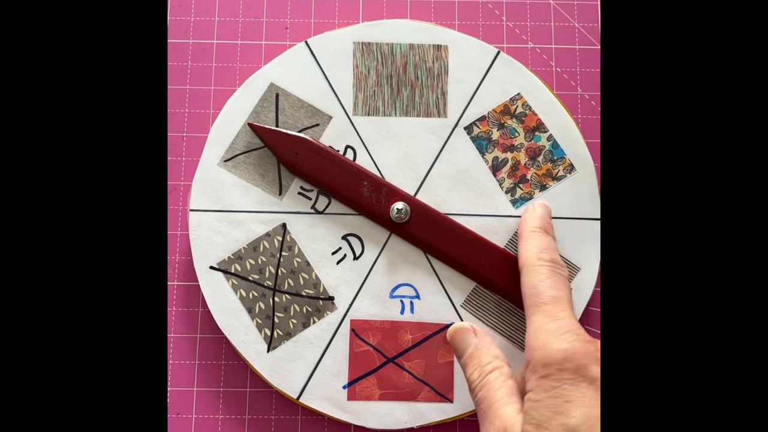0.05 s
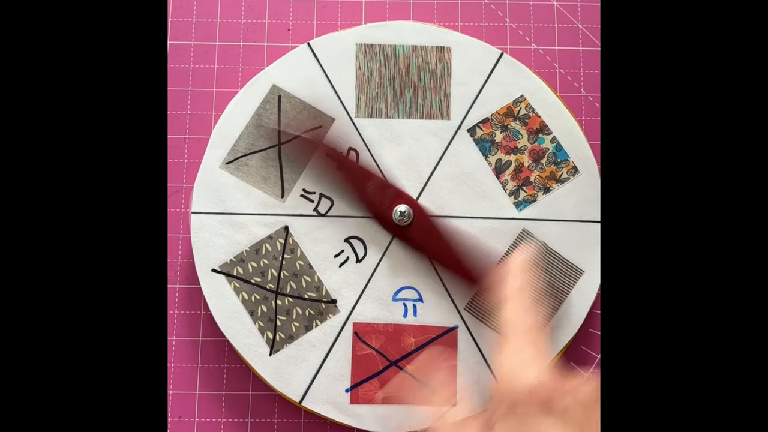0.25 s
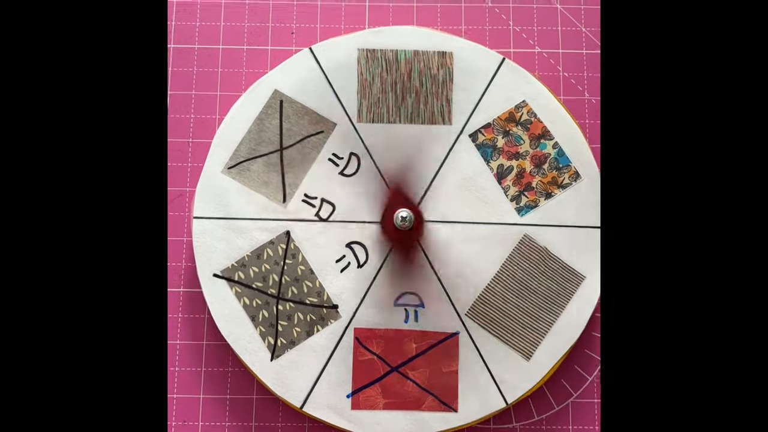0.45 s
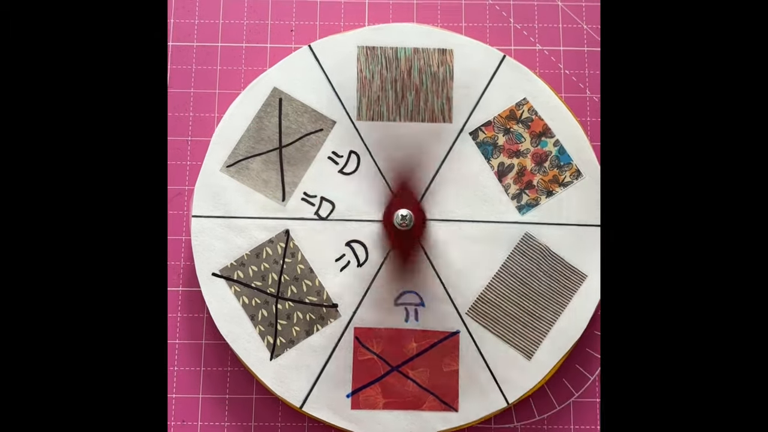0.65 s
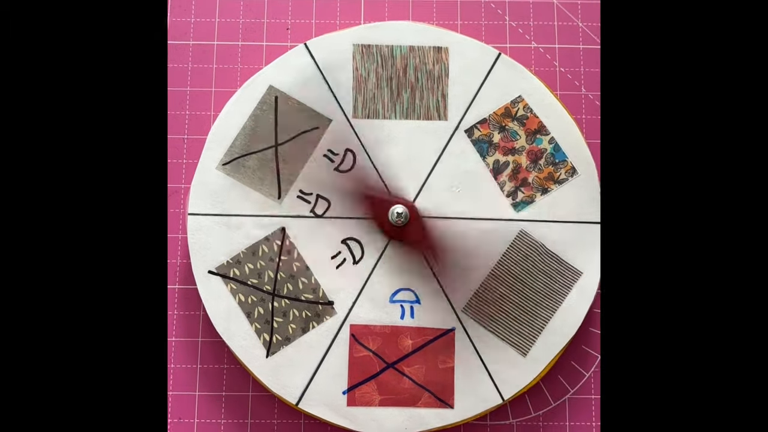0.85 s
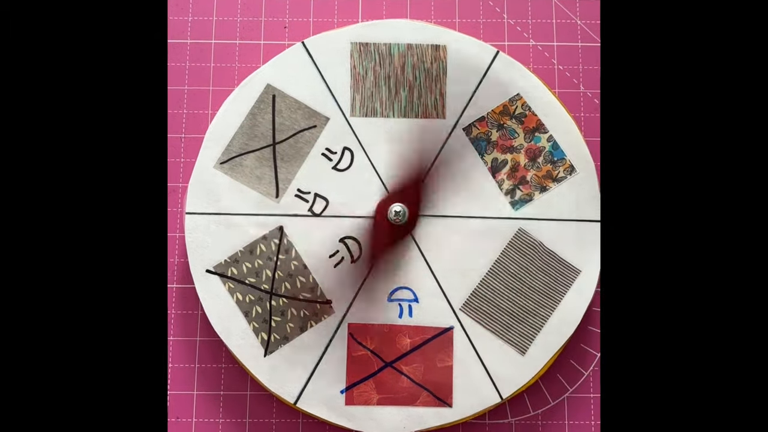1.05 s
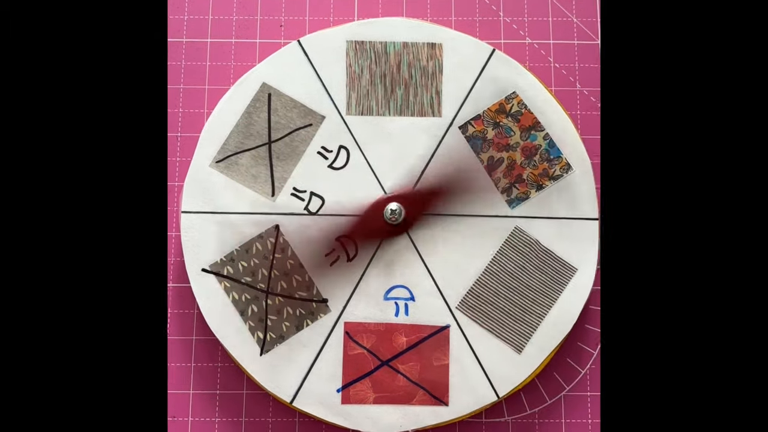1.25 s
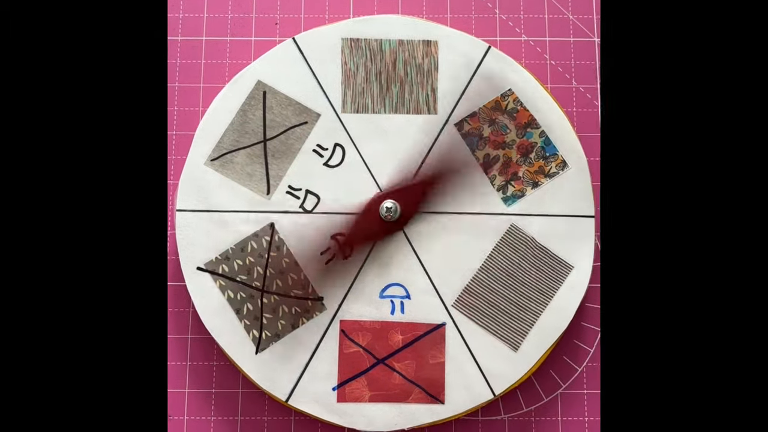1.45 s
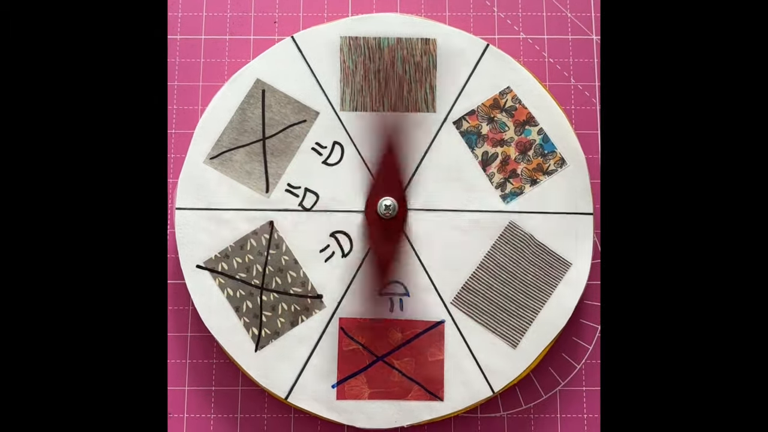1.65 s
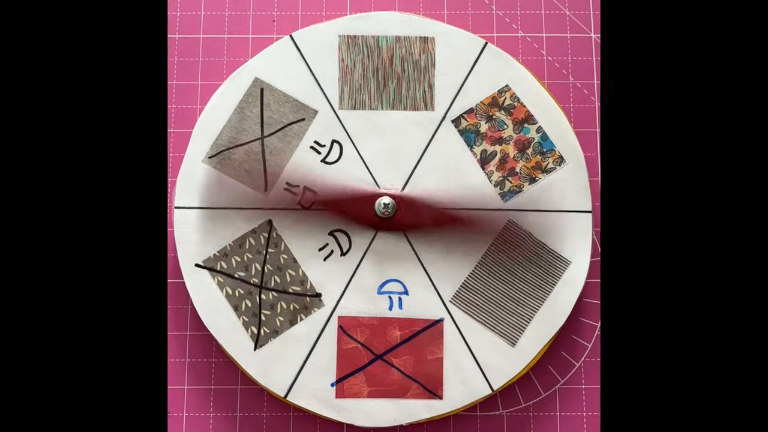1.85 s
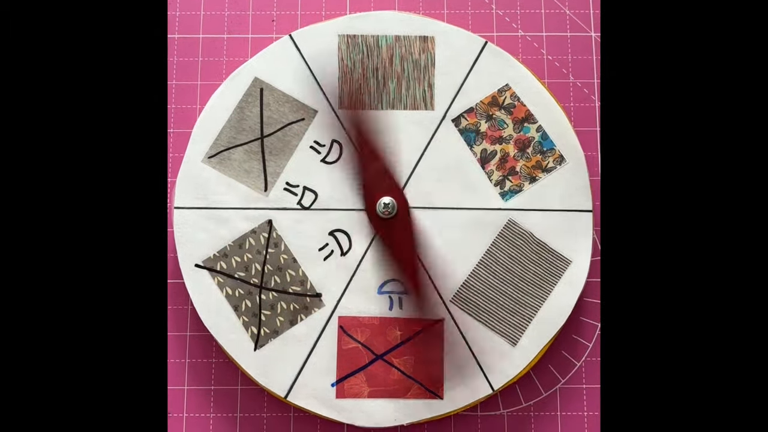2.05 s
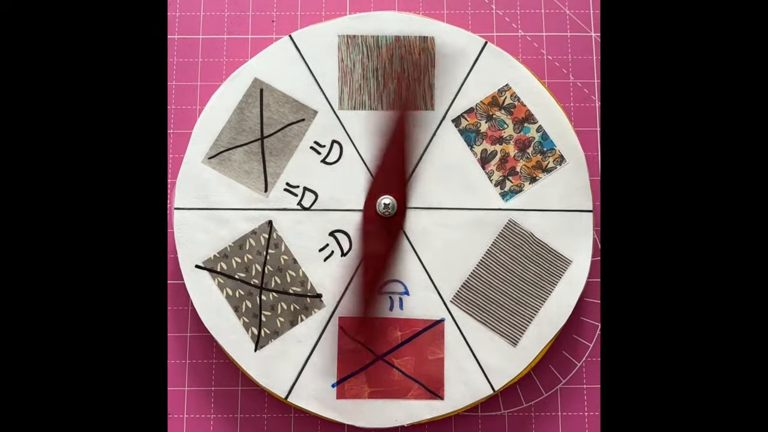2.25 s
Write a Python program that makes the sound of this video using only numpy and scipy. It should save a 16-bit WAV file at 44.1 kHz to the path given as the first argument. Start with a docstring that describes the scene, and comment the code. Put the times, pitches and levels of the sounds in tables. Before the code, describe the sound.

A game spinner's pointer is flicked with a sharp snap, then rattles rapidly, knocking on its board with small squeaks and metallic ticks. The rattle thins as the spin slows, heard close up in a small, quiet room.

```python
"""A sharp snap, then a dry, chirpy rattle: a finger flicks the pointer of a homemade spinning wheel.
Loose on its screw, the pointer rocks and knocks on the board, its hub chirps, rasps and rubs,
and the metal washer ticks. The rattle thins out as the spin slows.
Underneath, the board rumbles faintly on its table, in the still air of a small room."""
import sys
import numpy as np
from scipy import signal
from scipy.fft import rfft, irfft, next_fast_len
from scipy.io import wavfile
from scipy.ndimage import uniform_filter1d

SR = 44100
rng = np.random.default_rng(int(sys.argv[2]) if len(sys.argv) > 2 else 0)


def transcribe(signal):
    """Save signal, clipped to [-1, 1], as a 16-bit WAV file at the path in sys.argv[1]."""
    frames = np.atleast_2d(signal).T
    limited = np.clip(frames, -1, 1)
    pcm = np.round(limited * 32767).astype(np.int16)
    wavfile.write(sys.argv[1], SR, pcm)


N = 101429
T = np.arange(SR // 8) / SR   # time axis of one contact [s]
FLICK_S, REBOUND_S = .2291, .006
FADE_DB_PER_S = 6   # rubbing and faint contacts die away


# woody ring of pointer and board (frequency [Hz], level [dB], t60 [s])
BOARD_MODES = [(656.5, -28.5, 0.11), (916, -4, 0.064), (960.7, -2.5, 0.042), (1132, -5.5, 0.044),
               (1253, 4.5, 0.043), (1357.4, 2.5, 0.017), (1657, -6.5, 0.049), (1820, -13, 0.041),
               (2692, 4, 0.033), (2830, 4.5, 0.0057), (4130, -14, 0.023), (4688, -6.5, 0.026),
               (5006, -10, 0.011)]
# colour of the contact noise (frequency [Hz], level [dB])
CRACK_SPECTRUM = [(300, -32), (700, -25.5), (1000, 5.5), (1700, 6), (2900, -2), (3600, -9.5), (5000, -16),
                  (8000, -19.5), (15000, -30.5)]

def knock(db, middle_db, upper_db, damping=1, scatter=1):
    """The pointer hits the board: low, middle and upper modes ring over a short crack."""
    modes = np.array(BOARD_MODES) * [1, 1, damping]
    group = np.digitize(modes[:, 0], (1050, 2000))   # group edges [Hz]
    lags = REBOUND_S * damping * rng.random(2)
    low, middle, upper = [rebound(ring(modes[group == k], detune, scatter), lags, db=-9)
                          for k, detune in enumerate((.012, .025, .02))]
    body = unit(low + from_db(middle_db) * middle)
    crack = unit(noise(CRACK_SPECTRUM, len(T)) * decay(t60=.061 * damping))
    hit = body + from_db(upper_db) * upper + from_db(upper_db / 2 - 5.5) * crack
    return from_db(db - .5) * hit / loudest(body, size=132)


# accents of the rattle (time [s], relative level [dB], middle over low modes [dB], upper over body [dB])
KNOCK_HITS = [(0.2395, -33, 1, -25.5), (0.2481, -23.5, 2, -12), (0.276, -34, 1, 0.5),
              (0.317, -31.5, 1.5, 1), (0.334, -34.5, -6, -1), (0.3612, -22, -14, -7),
              (0.426, -36.5, 3, -3.5), (0.4445, -33, 31, -10), (0.466, -34.5, -6, -29),
              (0.4819, -24, -7.5, -11), (0.4942, -34, 25, 4.5), (0.5575, -31.5, -2, -1),
              (0.5657, -30, 6.5, -1.5), (0.6126, -32, -1, -5), (0.639, -33.5, 17, -2),
              (0.6954, -33.5, -6, -3.5), (0.7072, -27.5, 35, -6.5), (0.7358, -33, -9, -33),
              (0.7668, -21.5, -3.5, -10), (0.78, -47, 1, -9), (0.869, -30.5, 2, -8.5),
              (0.9089, -33, -12, -20), (0.923, -28.5, -1.5, 0.5), (0.9393, -29, 5, -1),
              (0.994, -34.5, -4, -7), (1.0331, -30.5, 3, -7), (1.0531, -26.5, 2, -21),
              (1.0638, -35.5, -24, -9.5), (1.0969, -37, 18, -0.5), (1.1085, -32.5, 10, -4),
              (1.1871, -40, -5, -5), (1.206, -36, 7, -5.5), (1.223, -32.2, 6, -6), (1.244, -33.5, -7, -5.5),
              (1.2732, -30, 2, -3), (1.2967, -32.5, 25, 2), (1.3338, -44, 15, 0.5), (1.407, -38.5, 23, 1),
              (1.4408, -35, -2, -28), (1.4491, -42.5, 0, -23), (1.4666, -44, 5, -25), (1.4886, -37, 5, 1.5),
              (1.4961, -21, 2, -5.5), (1.531, -40, -5, -21), (1.639, -40.5, -4, -4.5),
              (1.6486, -36.5, -4, -8), (1.6724, -36, -1.5, -21), (1.7105, -33.5, -14, -18),
              (1.739, -31.5, 14, -8.5), (1.7582, -37.5, -1, -8), (1.772, -34, 33, -6),
              (1.852, -40, -6, -22), (1.901, -35, 14, -6.5), (1.939, -34, -3, -32.5),
              (1.9733, -42.5, -2, -10), (1.9979, -25.5, -7, -12.5), (2.0184, -32, 12, -7.5),
              (2.037, -33, 5.5, -6), (2.0956, -35, -6, -23), (2.1756, -43.5, -11, -35.5),
              (2.2219, -35.5, 5, -11), (2.24, -40.5, 30, -8.5)]

def knocks():
    """The rocking pointer hits the board, with light touches between the accents."""
    accents = play(knock, KNOCK_HITS)
    touches = [(s, db, -3 + 2.8 * rng.normal(), -7.5) for s, db in faint_contacts(start_db=-41)]
    return accents + play(knock, touches)


def flick():
    """The pointer slips off the finger and snaps hard against board and washer."""
    out = np.zeros(N)
    release = knock(-26, middle_db=-10, upper_db=-12) + tick(-42.5, -42.5, -42.5)
    add(out, .2258, release)
    damping = .562   # the finger shortens the ring
    bright_modes = [(hz, db + 10 * (hz > 8000), t60 * damping) for hz, db, t60 in WASHER_MODES]
    edge = unit(noise(CLICK_SPECTRUM, len(T)) * decay(t60=.022))
    snap = ring(bright_modes, detune=0, scatter=0) + from_db(-7) * edge
    board = knock(-15.5, middle_db=6.5, upper_db=-5.5, damping=damping, scatter=0)
    washer_buzz = at_level(noise(CLICK_SPECTRUM, len(T)) * decay(t60=.2), db=-33)
    add(out, FLICK_S, board + washer_buzz + from_db(-9.5) * snap / loudest(snap, size=53))
    return out


def slip():
    """One slip of the hub: a gritty tone that swells and dies in about a hundredth of a second."""
    rise_s = .0014 * np.exp(.39 * rng.normal())
    hz = 2140 + 169 * rng.uniform(-.88, 1)
    tone = np.sin(2 * np.pi * hz * T) + from_db(-6.5) * noise(CRACK_SPECTRUM, len(T))
    return tone * T / rise_s * np.exp(-T / rise_s)


def chirp(db):
    """The hub catches and slips twice in quick succession."""
    first = slip()
    lag_s = .0058 * rng.uniform(.628, 1.4)
    second = np.interp(T - lag_s, T, slip(), left=0)
    return at_level(first + from_db(-8.5) * second, db - 3)


# squeaky accents of the hub (time [s], relative level [dB])
CHIRP_HITS = [(0.2818, -24.5), (0.4042, -26.5), (0.5053, -30.5), (0.529, -22), (0.5689, -33), (0.597, -32),
              (0.6534, -29), (0.6954, -31.5), (0.8005, -39.5), (0.8201, -36.5), (0.9506, -31),
              (0.9912, -32), (1.1864, -37), (1.2323, -31), (1.2425, -34), (1.2578, -25.5), (1.2934, -25.5),
              (1.3334, -29), (1.4548, -44), (1.4676, -32), (1.4881, -33.5), (1.5315, -36.5),
              (1.5487, -31.5), (1.5544, -42), (1.5856, -36), (1.6381, -37), (1.6681, -39.5),
              (1.7044, -27.5), (1.7201, -35.5), (1.7465, -37), (1.7962, -35), (1.8041, -36.5),
              (1.8471, -40), (1.9616, -36), (1.9738, -38.5), (2.0843, -32.5), (2.1008, -35)]

def chirps():
    """The hub keeps catching on the screw, with faint chirps between the clear ones."""
    return play(chirp, list(CHIRP_HITS) + faint_contacts(start_db=-40))


# metallic ring of washer and screw (frequency [Hz], level [dB], t60 [s])
WASHER_MODES = [(4570, -12.5, 0.016), (5015, 7, 0.024), (8450, -3, 0.0072), (9190, 5.5, 0.022),
                (9940, -2.5, .012)]
# colour of the washer's scratch (frequency [Hz], level [dB])
SCRATCH_SPECTRUM = [(3000, -13.5), (5000, -4.5), (5800, 0), (7000, -1.5), (8300, -15.5), (12000, -17)]
# bright edge of a metal contact (frequency [Hz], level [dB])
CLICK_SPECTRUM = [(3000, 0), (10000, 0), (12500, -4.5), (14800, 0.5), (16000, -17)]

def tick(ring_db, scratch_db, click_db):
    """The washer clicks, scratches along the screw and rings briefly, with a hissy tail."""
    tail = from_db(-13) * decay(t60=.093)
    metal = rebound(ring(WASHER_MODES, detune=.035), REBOUND_S * rng.random(2), db=-16)
    scratch = coloured(grains(per_s=8300) * (decay(t60=.011) + tail), SCRATCH_SPECTRUM)
    click = noise(CLICK_SPECTRUM, len(T)) * (decay(t60=.0063) + tail)
    return (at_level(metal, ring_db + 2.5) + at_level(scratch, scratch_db + 2)
            + at_level(click, click_db + 2.5))


# washer hits and their relative levels (time [s], ring [dB], scratch [dB], click [dB])
TICK_HITS = [(.2894,-61,-42,-66), (.3002,-41,-45,-52), (.3160,-46,-33,-51), (0.34,-47,-36.5,-56),
             (.358,-44,-44,-63), (0.4335,-47.5,-42,-55), (0.4584,-55,-46,-64), (.4803,-36.5,-45,-53),
             (.4968,-47,-48,-55), (0.544,-49,-40.5,-52), (.5657,-46,-39.5,-39), (0.5944,-51,-46.5,-45),
             (0.6368,-45,-44.5,-55), (.7023,-42,-52,-55), (0.7096,-39,-46,-43), (0.7317,-53,-43,-63),
             (.7668,-38,-40.5,-47), (.835,-51,-49,-70), (0.846,-49,-51,-56), (.865,-49,-46.5,-47),
             (.9208,-40.5,-46,-42), (0.9411,-44,-47,-47), (1.007,-47,-54,-58), (1.0342,-49,-40,-41),
             (1.102,-44.5,-42,-43), (1.111,-52.5,-58,-67), (1.2108,-47,-41,-56), (1.223,-43.5,-47,-43),
             (1.2747,-52,-46,-63), (1.2933,-50,-48,-63), (1.4085,-56,-44.5,-70), (1.4337,-55,-48.5,-52.5),
             (1.4974,-36.5,-49,-39), (1.607,-66.5,-51.5,-78), (1.638,-49.5,-51.5,-61),
             (1.6675,-50,-43.5,-58), (1.7047,-54,-76,-52.5), (1.7383,-53,-52,-58), (1.7464,-49,-49,-49),
             (1.8325,-54,-61.5,-55.5), (1.935,-56.5,-61.5,-53), (1.9936,-44.5,-46,-55),
             (2.0236,-51,-53,-66), (2.08,-58,-63.5,-52), (2.17,-71,-69,-65), (2.217,-59,-67,-62),
             (2.271,-60.5,-68,-53)]

def ticks():
    """The washer rattles on its screw through the spin."""
    return play(tick, TICK_HITS)


# short scrapes of the hub (time [s], length [s], level [dB])
RASP_STROKES = [(0.289, 0.044, -39.5), (0.417, 0.034, -42.5), (0.551, .045, -47), (0.681, 0.051, -49.5),
                (0.868, 0.012, -49), (1.005, 0.015, -38), (1.172, 0.025, -43.5), (1.227, 0.014, -44),
                (1.613, 0.012, -45)]
# their thin metallic colour (frequency [Hz], level [dB])
RASP_SPECTRUM = [(2500, -22), (4300, 4.5), (5100, 10.5), (5800, 2.5), (6900, -4), (8200, -9), (15000, -31)]

def rasps():
    """The hub scrapes round the screw in runs of tiny slips that swell and fade."""
    out = np.zeros(N)
    for s, length, db in RASP_STROKES:
        swell = np.sin(np.pi * np.minimum(T / length, 1)) ** .5 * (T < length)
        scrape = coloured(grains(per_s=4000) * swell, RASP_SPECTRUM)
        add(out, s, from_db(db) * scrape * np.sqrt(length * SR))
    return out


# colour of the rubbing hub (frequency [Hz], level [dB])
FRICTION_SPECTRUM = [(900, -23.5), (1500, 8.5), (2100, 4.5), (3300, 2.5), (5100, -7.5), (6000, -4),
                     (7200, -4.5), (9500, -9), (11000, -23), (15500, -18)]

def friction():
    """The hub rubs unevenly all through the spin, ever more softly."""
    age = np.arange(N) / SR - FLICK_S
    swing_db = 6.5 * np.interp(age * 28, np.arange(400), rng.standard_normal(400))   # 28 values a second
    spikes = rng.laplace(size=N) ** 3
    grain = noise(FRICTION_SPECTRUM, len(T)) * decay(t60=.012)
    grit = unit(signal.fftconvolve(spikes, grain)[:N]) * np.sqrt(N)
    return from_db(-59.5 - FADE_DB_PER_S * age + swing_db) * (age > 0) * grit


def faint_contacts(start_db, start_per_s=110, slowing_per_s=.42):
    """Light touches (time [s], level [dB]), rarer and weaker as the pointer slows."""
    rows, age = [], .012
    for gap, scatter_db in zip(rng.gamma(2, .5, 400), 3 * rng.standard_normal(400)):
        if FLICK_S + age < N / SR:
            rows.append((FLICK_S + age, start_db - FADE_DB_PER_S * age + scatter_db))
            age += gap * np.exp(slowing_per_s * age) / start_per_s
    return rows


def board_radiation(x, null_hz=774, null_width_hz=145, low_cut_hz=710):
    """The small board has a null between its lowest modes and keeps only a dull thud of its bass."""
    thud = signal.sosfilt(signal.butter(2, [170, 400], "band", fs=SR, output="sos"), x)
    notched = signal.lfilter(*signal.iirnotch(null_hz, null_hz / null_width_hz, fs=SR), x)
    thin = signal.sosfilt(signal.butter(4, low_cut_hz, "high", fs=SR, output="sos"), notched)
    return thin + from_db(-15.5) * thud


# swells of the board's rumble (time [s], relative level [dB])
RUMBLE_ENVELOPE = [(0.0, -73), (0.21, -76.5), (0.23, -63), (0.26, -50.5), (0.43, -69), (0.47, -58.5),
                   (0.65, -63), (0.69, -53.5), (0.84, -64), (1.08, -55), (1.32, -70.5), (1.76, -58),
                   (1.81, -61.5), (2.3, -66.5)]
# its dark colour (frequency [Hz], level [dB])
RUMBLE_SPECTRUM = [(15, -52.5), (25, -27.5), (81, -3), (118, -5), (150, 1.5), (198, -8), (236, -6.5),
                   (300, -20), (436, -18), (520, -38), (1100, -120)]

def rumble():
    """The board rumbles under the turning pointer and thumps after the flick."""
    t = np.arange(N) / SR
    level = from_db(.5 + np.interp(t, *np.transpose(RUMBLE_ENVELOPE)))
    bed = level * noise(RUMBLE_SPECTRUM, N)
    delay_s, width_s = .024, .049
    swell = from_db(-47) * np.exp(-((t - FLICK_S - delay_s) / width_s) ** 2) * (t > FLICK_S)
    thump = swell * noise([(25, -16.5), (70, 5), (120, 1), (300, -27), (1000, -68)], N)
    return signal.sosfilt(signal.butter(2, 600, fs=SR, output="sos"), bed + thump)


# stereo image of the wheel (frequency [Hz], left minus right [dB], left lead [rad])
STEREO_IMAGE = [(200, 0.1, -0.1), (650, 1.6, -0.3), (900, 1.0, -0.9), (1350, -1.1, -1.0),
                (1750, -1.8, -0.4), (2200, -8.8, 0.5), (2600, -4.7, 2.4), (3100, -3.3, 2.5),
                (3600, -0.8, 1.5), (4700, -6.6, 2.1), (5100, -0.6, 1.1), (5700, 0.4, 3.2),
                (9100, -0.0, 7.4), (15000, 1.7, 14.2)]

def stereo(x):
    """The wheel reaches each side with its own level and delay."""
    size = next_fast_len(N + SR // 10, True)
    hz = np.fft.rfftfreq(size, 1 / SR)
    balance = from_db(at_hz(STEREO_IMAGE, hz))
    lead = np.exp(.5j * at_hz(STEREO_IMAGE, hz, column=2))
    sides = np.array([balance * lead, 1 / lead]) * np.sqrt(2 / (1 + balance ** 2))
    return irfft(rfft(x, size) * sides, size)[:, :N]


# boxy colour of the room (frequency [Hz], level [dB])
ROOM_SPECTRUM = [(300, 23), (1000, 1), (2500, 5), (5000, 4.5), (9000, 1.5), (15000, -5)]

def room(x, t60=.18, predelay_s=.006):
    """The small room answers with a short diffuse tail, different on each side."""
    t = np.arange(SR // 2) / SR
    fade = from_db(-60 * t / t60) * (t > predelay_s)
    tails = [signal.fftconvolve(side, unit(noise(ROOM_SPECTRUM, len(t)) * fade))[:N] for side in x]
    return from_db(-13) * np.array(tails)


def air():
    """Still air: a very faint, dark hiss on each side."""
    spectrum = [(100, 3.5), (300, 1), (1000, -11.5), (4000, -22), (16000, -29)]
    return from_db(-76.5) * np.array([noise(spectrum, N), noise(spectrum, N)])


def ring(modes, detune, scatter=1):
    """Decaying modes of unit energy; scatter varies their strength and pitch from hit to hit."""
    out = np.zeros(len(T))
    for k, (hz, db, t60) in enumerate(modes):
        gain = (-1) ** k * from_db(db + scatter * 2.5 * rng.normal())
        shifted_hz = hz * (1 + scatter * detune * rng.normal())
        out += gain * np.sin(2 * np.pi * shifted_hz * T) * decay(t60)
    return unit(out)


def rebound(x, lags, db):
    """A contact touches again within a few milliseconds; unit energy."""
    return unit(x + sum(from_db(db) * np.interp(T - lag, T, x, left=0) for lag in lags))


def grains(per_s):
    """Tiny slips at random moments."""
    return (rng.random(len(T)) < per_s / SR) * rng.standard_normal(len(T))


def noise(spectrum, size):
    """Coloured noise of rms one."""
    return coloured(rng.standard_normal(size), spectrum) * np.sqrt(size)


def coloured(x, spectrum):
    """Give a sound a spectrum (frequency [Hz], level [dB]); unit energy."""
    size = next_fast_len(len(x) + 512, True)
    gain = from_db(at_hz(spectrum, np.fft.rfftfreq(size, 1 / SR)))
    return unit(irfft(rfft(x, size) * gain, size)[:len(x)])


def at_hz(points, hz, column=1):
    """Read a column of a table on a log-frequency axis."""
    points = np.array(points)
    return np.interp(np.log(hz + 1), np.log(points[:, 0]), points[:, column])


def decay(t60):
    """Fall by 60 dB in t60 seconds."""
    return from_db(-60 * T / t60)


def from_db(db):
    """Decibels to gain."""
    return 10 ** (np.asarray(db) / 20)


def unit(x):
    """Scale to unit energy."""
    return x / np.sqrt(np.sum(x ** 2) + 1e-20)


def loudest(x, size):
    """Highest rms over a window of size samples."""
    return np.sqrt(uniform_filter1d(x ** 2, size, mode="constant").max())


def at_level(x, db):
    """Set the loudest three milliseconds to a level."""
    return from_db(db) * x / loudest(x, size=132)


def add(track, s, sound):
    """Mix a sound in at s seconds."""
    i = min(int(s * SR), N)
    track[i:i + len(sound)] += sound[:N - i]


def play(voice, cues):
    """Trigger a voice for each cue: a time [s], then the voice's settings."""
    out = np.zeros(N)
    for s, *settings in cues:
        add(out, s, voice(*settings))
    return out


def scene():
    """The wheel close by, its room, and still air."""
    contacts = flick() + friction() + knocks() + chirps() + ticks() + rasps()
    direct = stereo(board_radiation(contacts))
    return direct + room(direct) + rumble() + air()


def record(dry):
    """The top is cut steeply above 16 kHz."""
    return signal.sosfilt(signal.ellip(10, .1, 80, 16000, fs=SR, output="sos"), dry)


dry = scene()
out = record(dry)
transcribe(out)
```